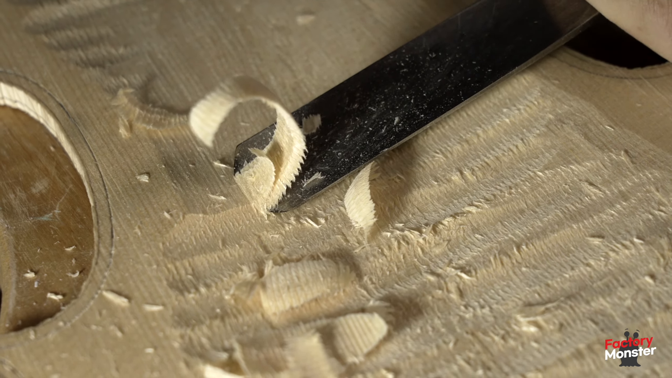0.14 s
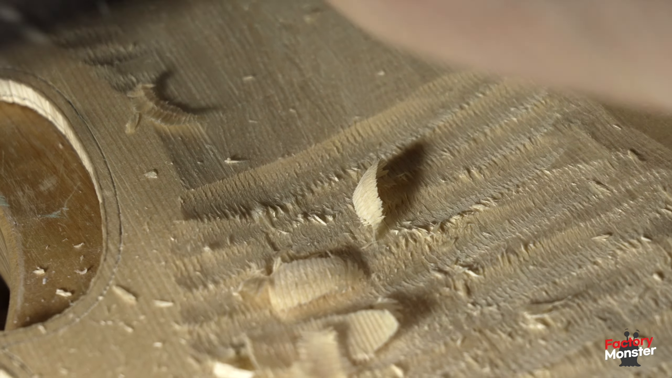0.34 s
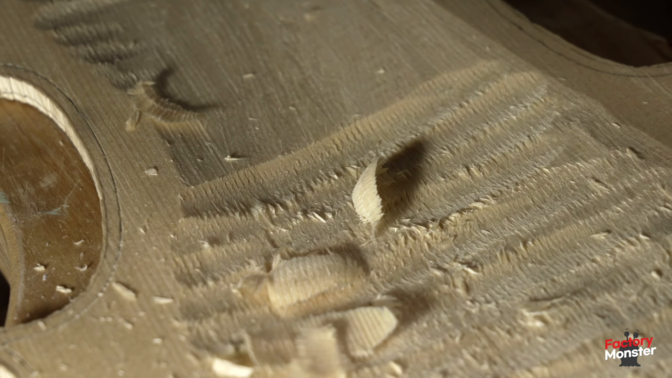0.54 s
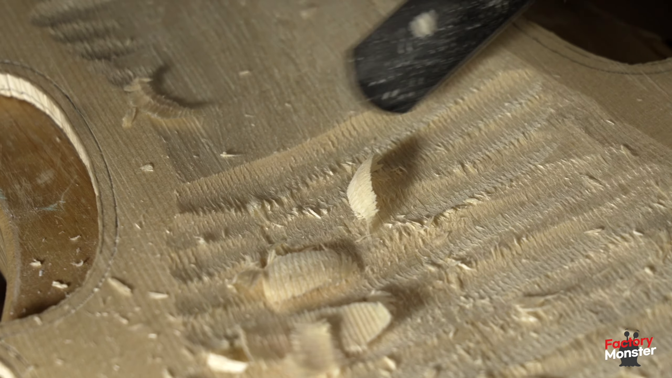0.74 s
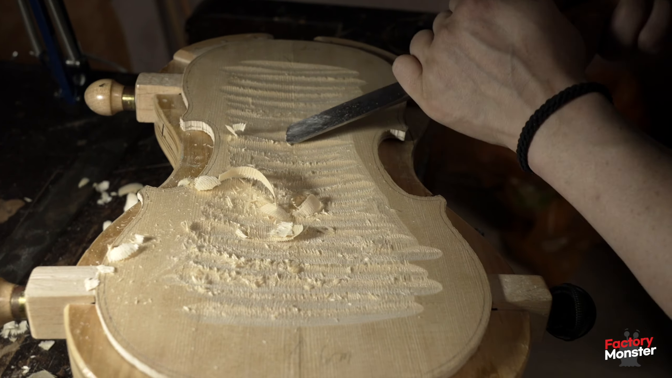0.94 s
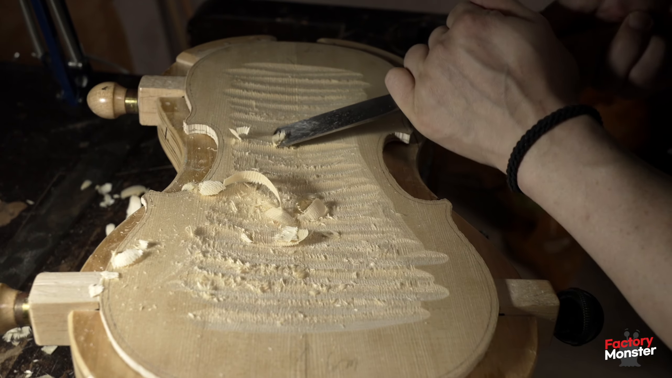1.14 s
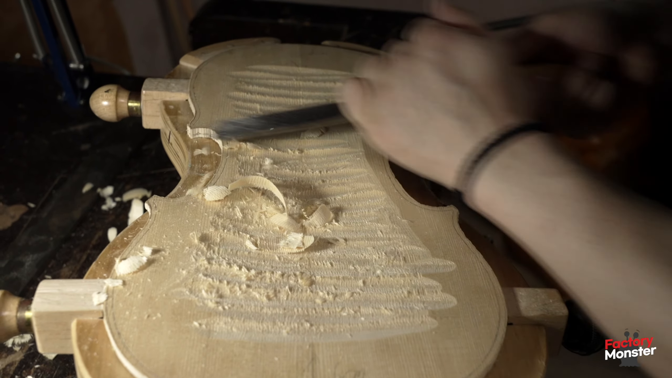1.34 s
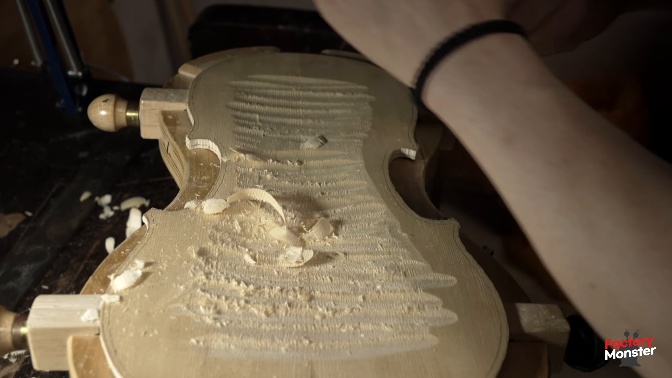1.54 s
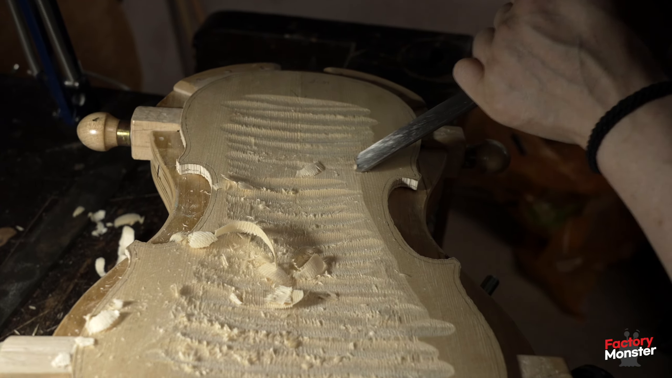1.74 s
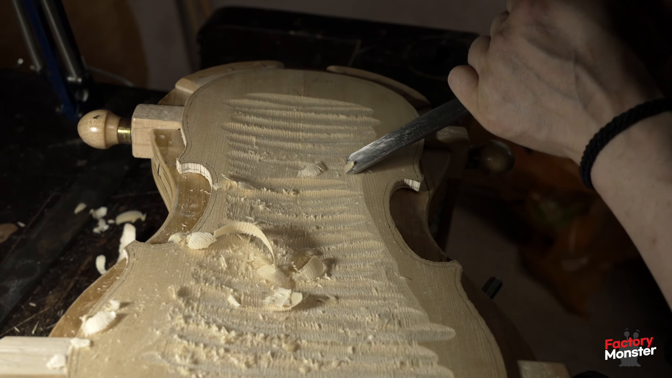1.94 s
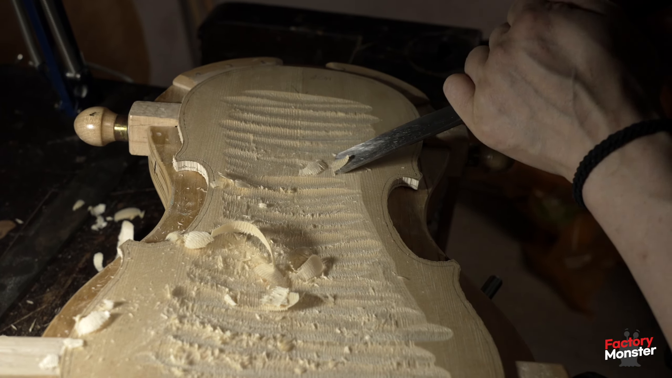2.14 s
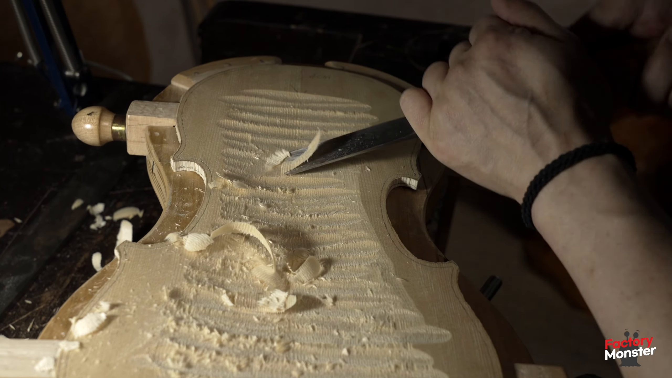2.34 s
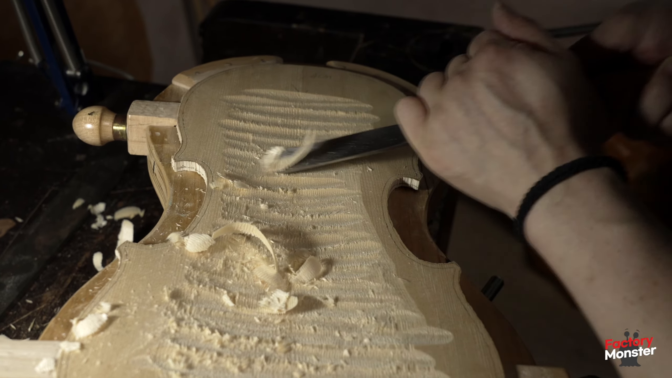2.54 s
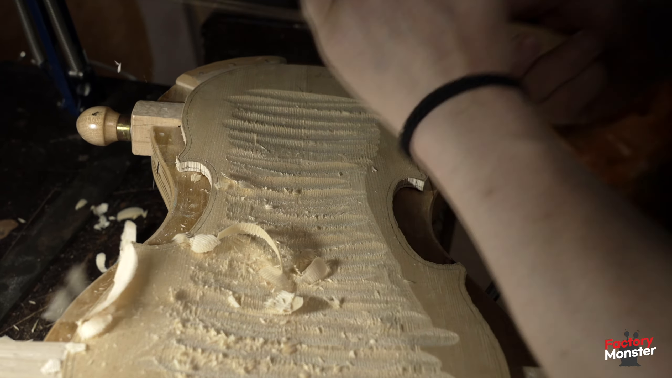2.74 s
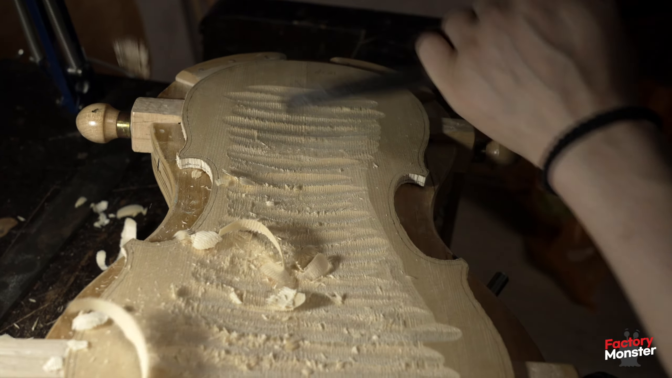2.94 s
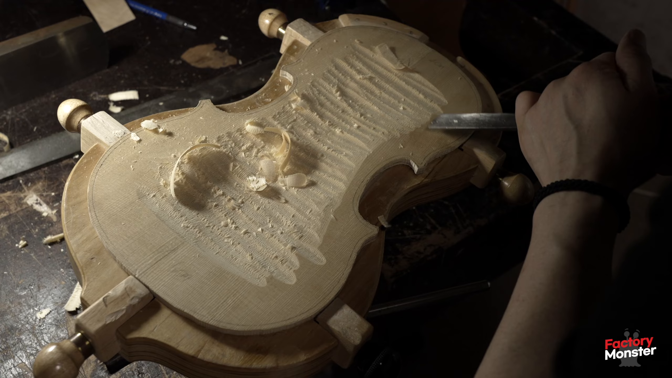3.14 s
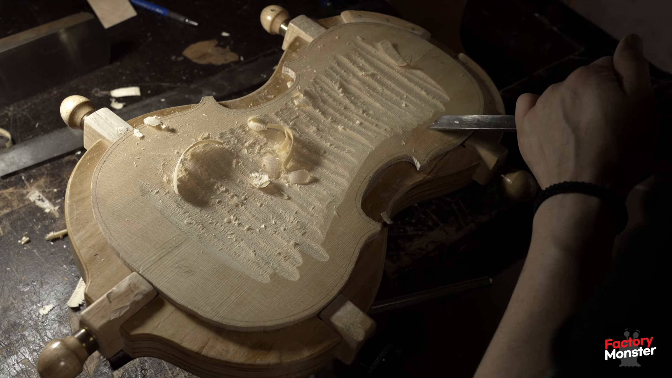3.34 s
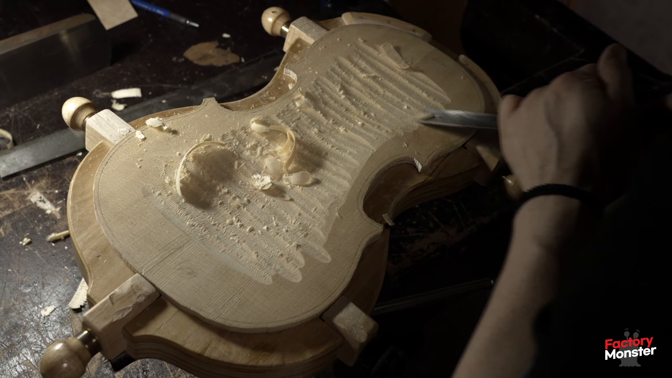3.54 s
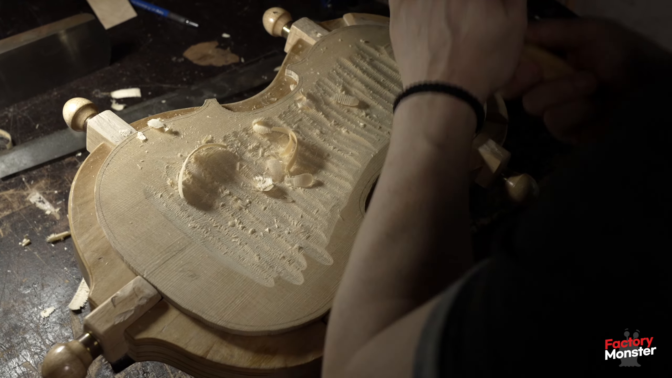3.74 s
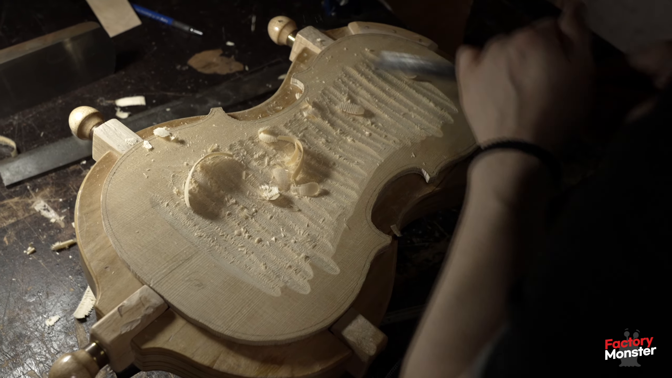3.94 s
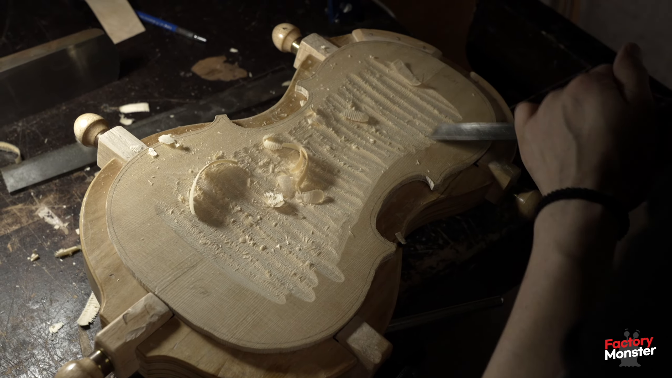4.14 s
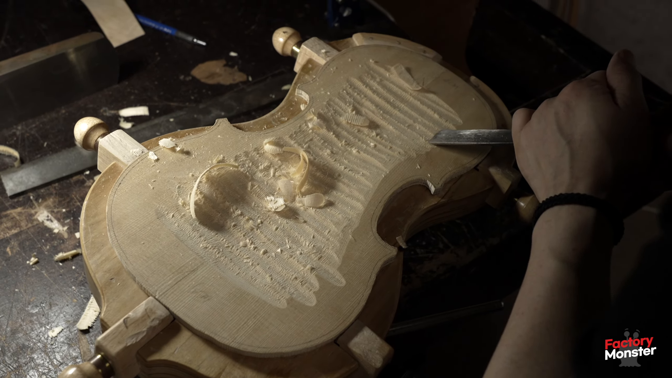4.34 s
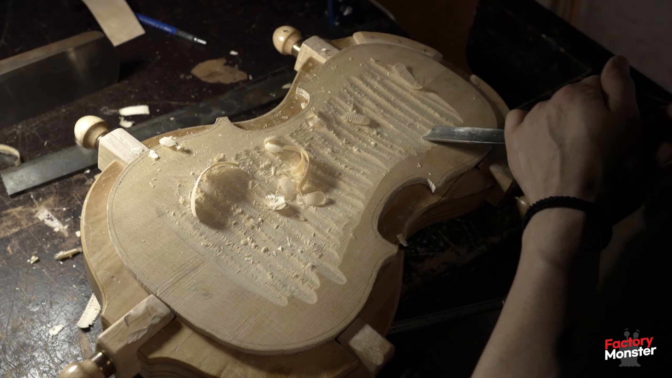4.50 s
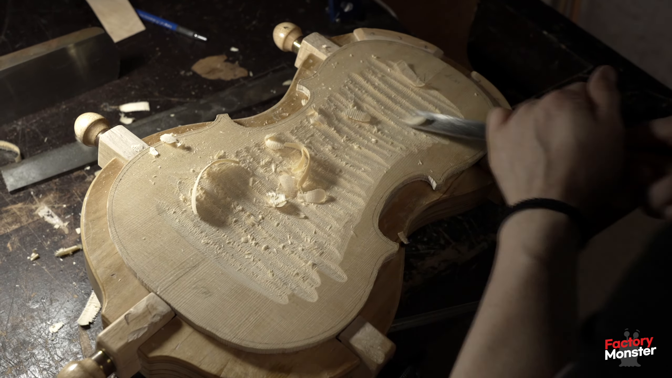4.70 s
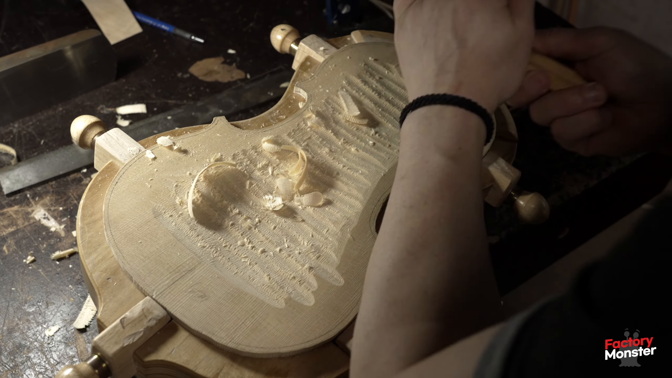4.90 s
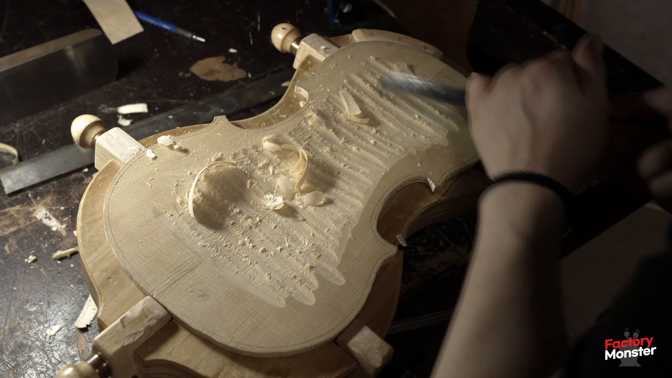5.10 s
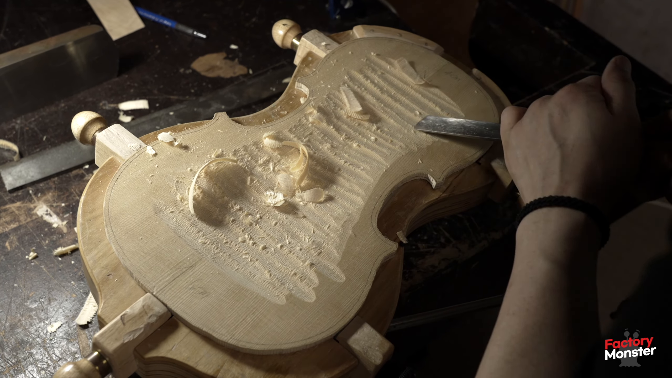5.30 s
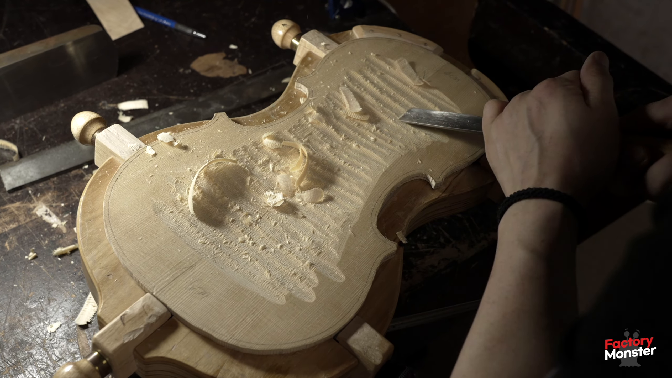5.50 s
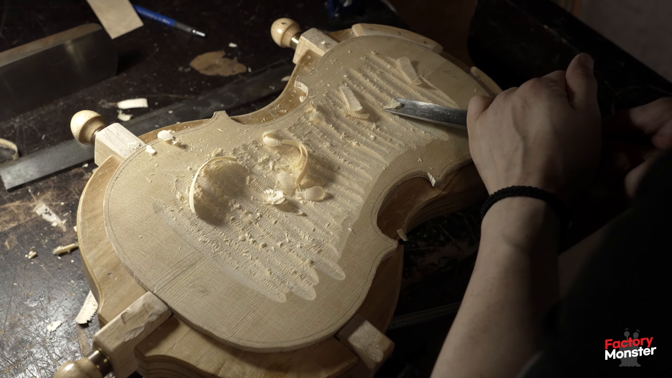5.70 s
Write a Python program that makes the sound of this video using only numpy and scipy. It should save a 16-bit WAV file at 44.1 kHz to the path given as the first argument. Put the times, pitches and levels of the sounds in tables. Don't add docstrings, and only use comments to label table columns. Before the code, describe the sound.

Close woodcarving: jerky rasping cuts and brittle snaps ring a thin arched board, split by quiet gaps, hollow knocks and faint far clicks.

```python
import sys
import numpy as np
from scipy import signal
from scipy.fft import rfft, irfft
from scipy.io import wavfile
from scipy.ndimage import uniform_filter1d

SR = 44100
rng = np.random.default_rng(int(sys.argv[2]) if len(sys.argv) > 2 else 0)


def how_loud(loudness_db):
    steps = np.asarray(loudness_db, float) / 20
    return 10 ** steps


def transcribe(u):
    v = np.clip(np.atleast_2d(u).T, -1, 1)
    q = np.round(v * 32767).astype(np.int16)
    wavfile.write(sys.argv[1], SR, q)


N = 258426

# frequency_hz, density_db
AIR_SPECTRUM = [(15, -36), (25, -5.5), (97, -19.5), (223, -14.5), (256, -12.5), (363, -23), (516, -26.5),
                (624, -22.5), (754, -30), (840, -26), (16000, -65)]
AIR_DB = -53.5
# frequency_hz, t60_s
ROOM_DECAY = [(250, 0.38), (1000, 0.27), (4000, 0.32), (12000, 0.18)]
ROOM_DB = -16
# start_s, boom_db, rumble_db
BENCH_HEAVES = [(.01, -30.5, -35.5), (.13, -35.5, -38.5), (0.249, -29.5, -27.5), (0.328, -26, -29),
                (.42, -34.5, -38), (.6, -54, -40), (0.818, -50, -29.5), (1.143, -31, -36.5),
                (1.338, -41, -34), (1.791, -50, -49), (1.88, -51, -46), (1.971, -47, -37),
                (2.098, -33.5, -32), (2.235, -48, -25.5), (2.33, -39, -36), (2.58, -37.5, -30),
                (3.229, -69, -41), (3.39, -59, -41), (3.47, -48, -40.5), (3.569, -42, -28),
                (4.231, -56, -46.5), (4.37, -63, -41.5), (4.44, -54, -47), (4.569, -45, -37),
                (4.68, -44, -33.5), (4.828, -49, -38.5), (5.27, -63, -42), (5.468, -40.5, -33.5),
                (5.712, -32.5, -33.5), (5.82, -34.5, -46)]
# centre_hz, width_hz, level_db
BENCH_MODES = [(145.7, 11, 9.5), (182.8, 31, 2), (254, 23, 0.5), (312.3, 22, 2), (383, 45, 4)]
# start_s, peak_db
FAR_CLICKS = [(0.5292, -34.5), (0.6704, -28), (1.5958, -44), (2.8753, -50), (3.0229, -52), (3.8252, -44.5),
              (3.9708, -37.5), (4.1112, -40.5), (4.9953, -42), (5.1367, -37), (5.2674, -43)]
# centre_hz, width_hz, level_db
FAR_CLICK_MODES = [(3670, 14, 3.5), (4020, 150, -7), (4430, 45, 4.5), (4950, 130, -7.5), (4210, 1200, -9.5)]
# start_s, end_s, top_hz, end_hz, level_db
SKIN_SQUEAKS = [
    (0.366, .54, 14900, 10100, -64),
    (.37, .5, 14000, 12100, -65),
    (4.107, 4.19, 11240, 9900, -73),
    (4.12, 4.177, 13900, 13300, -78),
    (4.12, 4.204, 10400, 9800, -71),
]
# start_s, peak_db
CHIP_TICKS = [(0.0816, -29.5), (0.1865, -35), (0.1927, -39), (0.2572, -10.5), (0.5891, -38.5),
              (0.7291, -26.5), (0.7791, -55), (1.1148, -31), (1.2287, -36), (1.2713, -37), (1.2955, -27.5),
              (2.1635, -14), (2.397, -24.5), (2.422, -38), (2.475, -48), (2.5071, -53.5), (3.3497, -57),
              (5.6125, -25.5), (5.7274, -24.5), (5.7436, -22), (5.791, -15.5)]
# start_s, peak_db
CRUMB_TICKS = [(0.5876, -37.5), (0.784, -42.5), (1.475, -48), (1.495, -54), (1.6247, -59), (1.6454, -63),
               (2.7615, -53), (2.7906, -51), (2.9437, -46), (3.3886, -39), (4.0168, -59), (4.0542, -56.5),
               (4.0694, -63.5), (4.0966, -60)]
# centre_hz, width_hz, level_db
CHIP_MODES = [(3470, 1200, -5), (6280, 1700, -5.5), (8450, 1600, -0.5), (13000, 4100, -7)]
# start_s, peak_db, low_hz, high_hz, high_note_db
TOOL_KNOCKS = [
    (0.152, -12, 926, 1126, -15),
    (0.807, -6.5, 1016, 1002, -5),
    (3.215, -19, 1070, 1200, -0.5),
    (4.191, -16.5, 1033, 1156, -0.5),
    (5.246, -31, 960, 1150, -11),
]
KNOCK_CRACKS = [-9, -23, -24, -25.5, -34]
# centre_hz, width_hz, level_db
FIRST_PLATE_MODES = [(882, 156, 1.5), (993, 250, -4), (1200, 63, -6), (1520, 75, -10), (1860, 240, -17),
                     (2170, 65, -7.5), (2596, 470, -17), (3160, 240, -15.5), (3570, 190, -14),
                     (4180, 220, -15), (4570, 120, -17), (620, 300, -11), (322, 75, -5),
                     (5630, 2000, -27.5)]
# centre_hz, width_hz, level_db
PLATE_MODES = [(624, 42, -1), (887, 41, 3), (974, 111, 3), (1070, 160, 2), (1207, 140, -4), (1363, 87, -6),
               (1502, 163, -2.5), (1932, 72, -2), (2092, 200, -5.5), (2630, 990, -17.5), (3567, 178, -3),
               (3756, 190, -6.5), (3890, 1000, -22), (1300, 1000, -8)]
# centre_hz, width_hz, level_db
BLADE_MODES = [(4820, 170, 3), (5870, 740, 0), (6290, 510, 0.5), (8020, 220, 4), (9620, 350, -4),
               (9890, 600, -3), (11200, 260, -5), (11330, 240, -0.5), (13440, 600, -9), (13060, 1100, -5.5),
               (15000, 1700, -5), (7100, 4200, -18)]
# start_s, peak_db
EDGE_SNAPS = [(0.2103, -33), (0.2198, -18), (.2344, -11), (1.002, -39), (1.0558, -26.5), (1.0897, -26),
              (1.1587, -34), (1.2438, -31.5), (1.2648, -36), (1.3022, -20), (1.671, -63), (1.756, -32.5),
              (1.7904, -37.5), (1.862, -33.5), (1.8895, -24.5), (1.908, -17.5), (1.952, -25.5),
              (1.973, -32), (2.038, -19), (2.0578, -8), (2.068, -8.5), (2.0795, -13), (2.0962, -10.5),
              (2.1866, -15.5), (2.201, -18), (2.2204, -14.5), (2.5624, -16), (3.3822, -43), (4.3274, -59),
              (4.79, -16.5)]
# start_s, peak_db
GRAIN_STEPS = [(3.4428, -38), (3.498, -17.5), (3.5232, -30), (3.5327, -21), (3.5475, -14), (3.5581, -15),
               (4.4134, -42), (4.4235, -34), (4.464, -40), (4.4867, -23.5), (4.5262, -21), (4.5422, -18),
               (4.5606, -9.5), (4.5839, -11), (4.6103, -6.5), (4.627, -20), (4.6463, -10), (4.6709, -21),
               (4.693, -9.5), (4.7112, -25), (5.4462, -23), (5.5544, -29), (5.5738, -35), (5.5912, -26),
               (5.6317, -19), (5.6517, -12), (5.672, -11.5), (5.6882, -9.5), (5.7104, -23), (5.8542, -17)]
# start_s, bite_s, hold_s, level_db, brightness_db
SWEEPING_CUTS = [
    (.2, 0.043, 0.047, -11, -12.5),
    (1.06, 0.08, 0.0091, -28.5, -10),
    (1.285, 0.051, 0.0065, -20, -9),
    (1.74, 0.048, .004, -33, -10),
    (2.18, .019, 0.094, -18, -8.5),
    (2.54, 0.052, 0.033, -16, -9.5),
    (3.538, 0.018, 0.039, -19, -9.5),
    (4.7, 0.024, 0.036, -17, -8),
    (5.385, 0.058, 0.037, -35.5, -12.5),
]
# start_s, length_s, first_db, last_db, brightness_db
JERK_RUBS = [(1.225, 0.05, -39, -47, -3), (1.858, 0.051, -26.5, -27, -10.5), (1.95, 0.024, -25, -22, -11.5),
             (2.035, 0.018, -34, -11, -12.5), (2.061, 0.064, -20, -26, -12),
             (2.165, 0.021, -20.5, -28.5, -23), (3.445, 0.039, -25, -15, -13),
             (3.516, 0.054, -27.5, -28.5, -18), (4.412, 0.032, -36, -29, -15),
             (4.468, 0.027, -34.5, -25, -13), (4.507, .146, -24.5, -19, -12.5),
             (4.653, 0.04, -16.5, -24.5, -8.5), (5.535, 0.041, -31, -28, -12), (5.584, 0.17, -21, -22, -11),
             (5.698, 0.041, -16.5, -17, -12), (5.8, .016, -32, -27, -16), (5.828, 0.036, -24, -27.5, -10.5)]
# start_s, length_s, first_db, last_db, brightness_db
LIGHT_DRAGS = [(0, 0.1, -32, -57, -17.5), (.07, 0.14, -47.5, -56, -18), (.3, 0.15, -20, -48, -25),
               (.42, 0.353, -47.5, -46.5, -18), (.82, 0.13, -48.5, -47, -6),
               (1.005, 0.14, -39.5, -35.5, -12), (1.672, 0.033, -49, -54.5, -10.5),
               (2.393, 0.0072, -58, -51.5, 11.5), (3.31, 0.057, -59.5, -49.5, -18),
               (3.378, 0.0055, -51, -33, -21), (3.613, 0.049, -37, -31, -17),
               (4.06, .055, -77.5, -62.5, -5), (4.3, 0.024, -65, -47, -17), (4.365, 0.038, -52.5, -62, -33),
               (5.257, 0.042, -65, -67, 6), (5.33, 0.059, -76, -54, -6), (5.5, 0.011, -61, -43.5, -18)]


def level(x, db):
    return x * how_loud(db) / np.sqrt(np.mean(x ** 2))


def band(x, hz, width):
    return signal.lfilter(*signal.iirpeak(hz, hz / width, fs=SR), x)


def ring(x, modes):
    return sum((-1) ** k * how_loud(db) * band(x, hz, width) for k, (hz, width, db) in enumerate(modes))


def roam(x, modes, spread_db):
    share = how_loud(spread_db * rng.standard_normal((len(modes), 30)))
    share = np.repeat(share, N // 30 + 1, axis=1)
    out = np.zeros(N)
    for k, (hz, width, db) in enumerate(modes):
        top = band(x * share[k, :N], hz, width)
        out += how_loud(db) * band(top, hz, 1.8 * width)
    return out


def colour(x, points):
    hz, db = np.transpose(points)
    f = np.maximum(np.arange(len(x) // 2 + 1) * SR / len(x), 1)
    gain = how_loud(np.interp(np.log(f), np.log(hz), db))
    return irfft(rfft(x) * gain, len(x))


def walk(rate_hz):
    hold = int(SR / rate_hz)
    steps = np.repeat(rng.standard_normal(N // 100), hold)[:N]
    return uniform_filter1d(steps, hold // 2)


def fade(seconds, t60):
    return np.exp(-np.log(1000) * np.arange(int(seconds * SR)) / SR / t60)


def add(out, s, x):
    i = int(s * SR)
    out[i:i + len(x)] += x[:N - i]


def bursts(times, levels_db, t60, run_on):
    out = np.zeros(N)
    shapes = run_on * rng.standard_normal((len(times), SR // 40)) * fade(1 / 40, t60)
    shapes[:, 0] = 1
    for s, db, shape in zip(times, levels_db, shapes):
        add(out, s, how_loud(db) * shape)
    return out


def still_air():
    return level(colour(rng.standard_normal(N), AIR_SPECTRUM), AIR_DB)


def room(x):
    tail = np.zeros(SR // 2)
    for hz, t60 in ROOM_DECAY:
        tail += band(rng.standard_normal(SR // 2), hz, hz * 1.8) * fade(1 / 2, t60) / np.sqrt(hz)
    tail = colour(tail, [(100, -6), (16000, 5.0)])
    tail[:int(.006 * SR)] = 0
    tail /= np.sqrt(np.sum(tail ** 2))
    return x + how_loud(ROOM_DB) * signal.fftconvolve(x, tail)[:N]


def heaves(s, db, rise_db_per_s, fall_db_per_s):
    since = np.arange(0, N, 32)[:, None] / SR - s
    loss_db = np.maximum(fall_db_per_s * since, -rise_db_per_s * since)
    return np.repeat(how_loud(db - loss_db).max(axis=1), 32)[:N]


def bench():
    s, boom_db, rumble_db = np.transpose(BENCH_HEAVES)
    boom_hz = 77
    boom = band(band(rng.standard_normal(N), boom_hz, 9), boom_hz, 33)
    boom /= uniform_filter1d(np.abs(boom), 3000) + 0.39 * np.std(boom)
    rumble = ring(rng.standard_normal(N), BENCH_MODES)
    boom = heaves(s, boom_db, 400, 85) * level(boom, 0)
    rumble = heaves(s, rumble_db, 795, 129.5) * level(rumble, -2.3)
    return boom + rumble


def far_clicks():
    force, length = np.zeros(N), 1 / 7
    shape = fade(length, 0.014) + 0.15 * fade(length, 0.29)
    for s, db in FAR_CLICKS:
        add(force, s, how_loud(db + 17) * rng.standard_normal(len(shape)) * shape)
    return ring(band(force, 3300, 1300), FAR_CLICK_MODES)


def squeaks():
    out = np.zeros(N)
    for start, end, top_hz, end_hz, db in SKIN_SQUEAKS:
        u = np.linspace(0, 1, int((end - start) * SR))
        arch = np.polyfit([0, .4, 1], [.93 * top_hz, top_hz, end_hz], 2)
        phase = 2 * np.pi * np.cumsum(np.polyval(arch, u)) / SR
        add(out, start, how_loud(db) * np.sin(np.pi * u) ** .5 * np.sin(phase))
    return out * (.7 + .9 * walk(350))


def chips():
    s, db = np.transpose(CHIP_TICKS + CRUMB_TICKS)
    force = bursts(s, db + 14.5, 0.017, 0.29)
    return how_loud(9) * force, ring(force, CHIP_MODES)


def knocks():
    note, blow = np.zeros(N), np.zeros(N)
    t = np.arange(int(.1 * SR)) / SR
    swell = (1 - np.exp(-t / .001)) * fade(len(t) / SR, 0.026)
    for s, db, low_hz, high_hz, high_db in TOOL_KNOCKS:
        pair = np.sin(2 * np.pi * low_hz * t) + how_loud(high_db) * np.sin(2 * np.pi * high_hz * t)
        add(note, s, -how_loud(db) * swell * pair)
        add(blow, s, how_loud(db) * np.hanning(12))
    crack = bursts(np.array(TOOL_KNOCKS)[:, 0], KNOCK_CRACKS, 0.045, .3)
    crack = band(band(crack, 2600, 1900), 2800, 2500)
    thud = how_loud(7.5) * ring(blow, BENCH_MODES)
    return blow, how_loud(3) * note + thud + crack


def plate(force):
    move, tail = int(.79 * SR), SR // 5
    out = roam(np.r_[np.zeros(move), force[move:]], PLATE_MODES, 1.5)
    out[:move + tail] += ring(np.r_[force[:move], np.zeros(tail)], FIRST_PLATE_MODES)
    return out


def pressure(strokes, db):
    out = np.zeros((2, N))
    for s, length, first_db, last_db, bright_db in strokes:
        i = np.arange(int(s * SR), min(int((s + length + .08) * SR), N))
        t = i / SR - s
        force_db = np.interp(t, [0, length], [first_db, last_db])
        force_db = force_db - 653 * np.maximum(t - length, 0)
        touch = np.clip(t / 0.00087, 0, 1)
        gain = touch * how_loud(db + force_db + np.array([[0], [bright_db]]))
        out[:, i] = np.maximum(out[:, i], gain)
    return out


def phases(cuts):
    strokes = []
    for s, bite, hold, db, bright_db in cuts:
        shaving_db = db - 10.5
        strokes.append((s, bite, db - 22.5, db, bright_db))
        strokes.append((s + bite, hold, db, db, bright_db))
        strokes.append((s + bite + hold, 0.092, shaving_db, shaving_db - 27.5, bright_db - 16))
    return strokes


def grip():
    t = np.arange(N) / SR
    s = np.sort(np.array(EDGE_SNAPS + GRAIN_STEPS)[:, 0])
    since = t - s[np.maximum(np.searchsorted(s, t) - 1, 0)]
    return how_loud(-12 * np.clip(since / .02, 0, 1))


def tearing(per_second, scatter_db, hiss, chatter_db):
    sizes = how_loud(scatter_db * rng.exponential(size=N)) * rng.choice([-1, 1], N)
    breaks = (rng.random(N) < per_second / SR) * sizes
    force = level(breaks, 0) + hiss * rng.standard_normal(N)
    chatter_hz = 169.3 * (1 + .17 * walk(90))
    slip = np.cumsum(chatter_hz / SR) % 1
    return level(force * how_loud(0.64 * walk(110) - chatter_db * slip), 0)


def gouge():
    push = pressure(LIGHT_DRAGS + phases(SWEEPING_CUTS), 0.45) + grip() * pressure(JERK_RUBS, -0.93)
    dull, sharp = push * tearing(2800, 2.8, .7, 12)
    s, db = np.transpose(EDGE_SNAPS + GRAIN_STEPS)
    just_after = np.minimum(((s + .004) * SR).astype(int), N - 1)
    on_plate, on_blade = push[:, just_after] + 1e-9
    bright = np.clip(on_blade / on_plate, 0, .4)
    probe = rng.standard_normal(SR // 4)
    dull = how_loud(-0.93) * dull / np.std(ring(probe, PLATE_MODES))
    dull += bursts(s, db + 24.5, 0.023, 0.023)
    sharp = how_loud(-3.0) * sharp / np.std(ring(probe, BLADE_MODES))
    sharp += bursts(s, db + 20 * np.log10(bright) + 19, 0.018, 0.11)
    crack = band(bursts(s, db + 12.5, 0.0038, 0.14), 1700, 2200)
    return dull, roam(sharp, BLADE_MODES, 3) + crack


def scene():
    forces, sounds = zip(gouge(), chips(), knocks())
    near = plate(sum(forces)) + sum(sounds) + far_clicks() + squeaks()
    return (room(near) + bench() + still_air())[None]


def top_cut(x):
    return signal.sosfilt(signal.butter(12, 17010, fs=SR, output="sos"), x)


def record(dry):
    soft = .8 * np.tanh(dry / .8)
    low_pass = signal.ellip(8, .2, 28, 15750, fs=SR, output="sos")
    finished = signal.sosfilt(low_pass, soft)
    return top_cut(finished)


dry = scene()
out = record(dry)
transcribe(out)
```